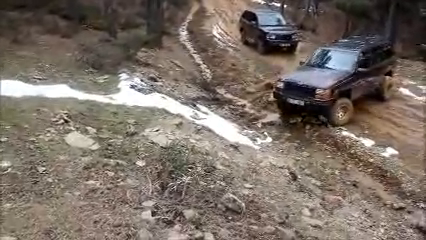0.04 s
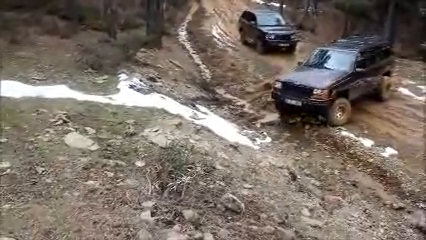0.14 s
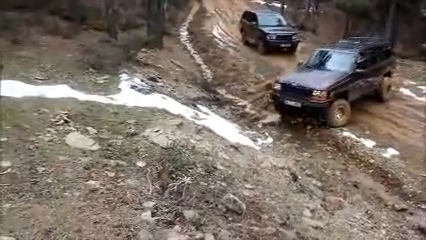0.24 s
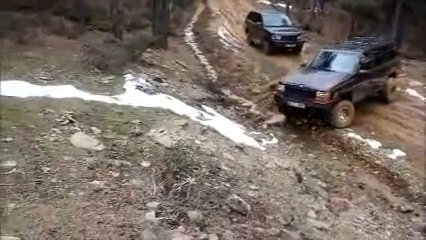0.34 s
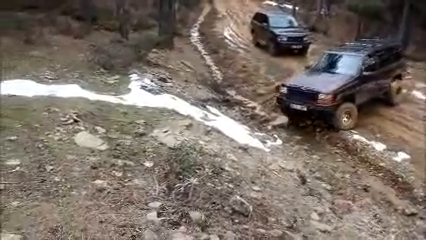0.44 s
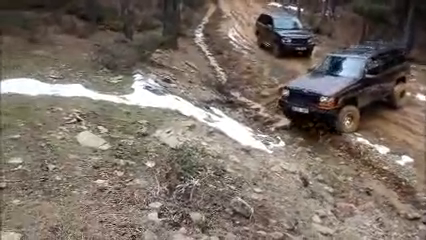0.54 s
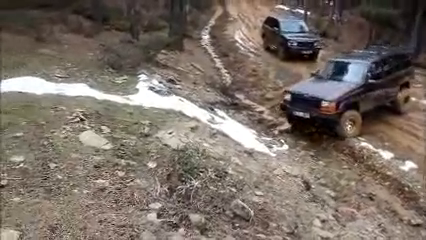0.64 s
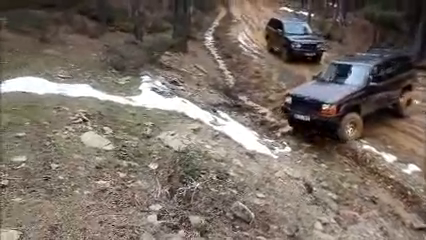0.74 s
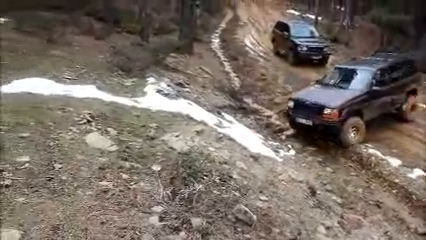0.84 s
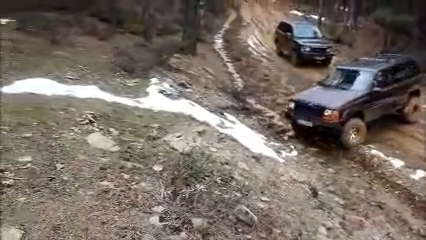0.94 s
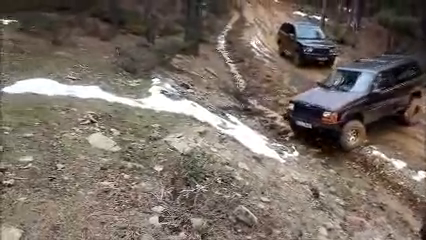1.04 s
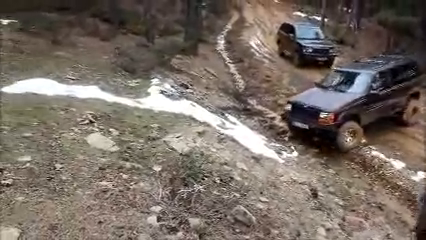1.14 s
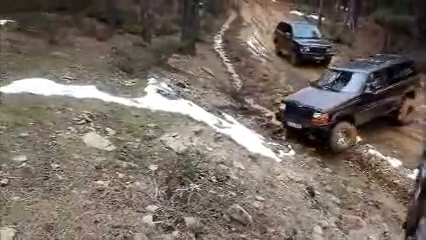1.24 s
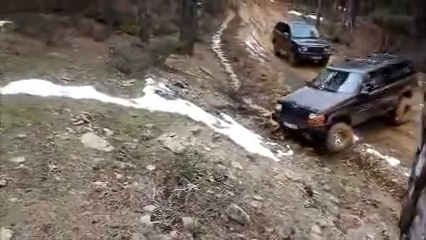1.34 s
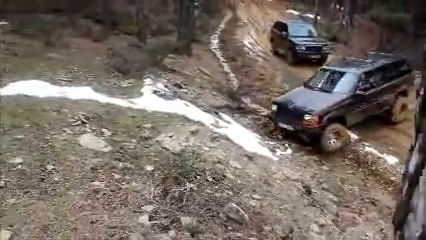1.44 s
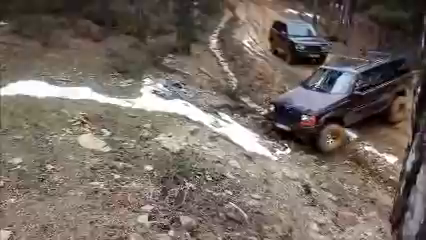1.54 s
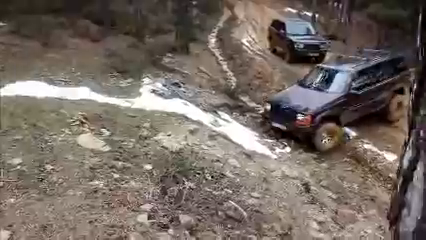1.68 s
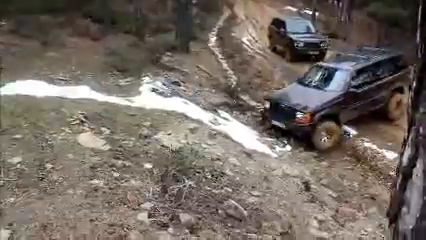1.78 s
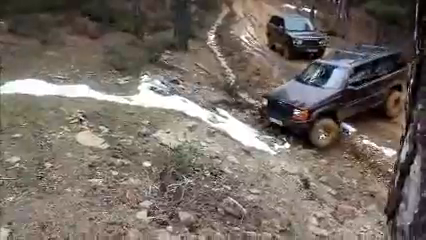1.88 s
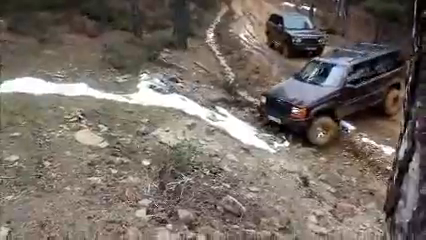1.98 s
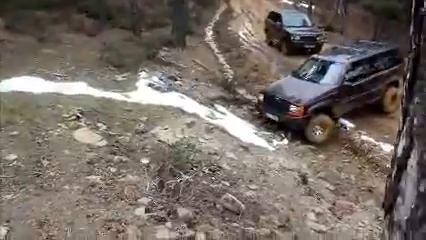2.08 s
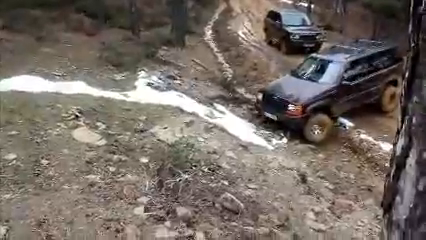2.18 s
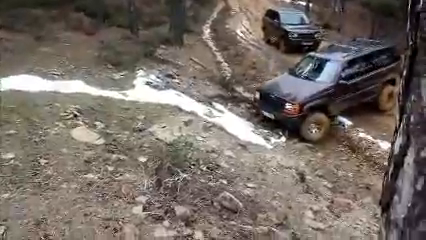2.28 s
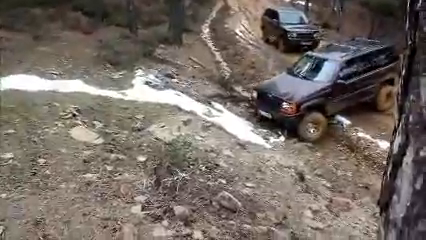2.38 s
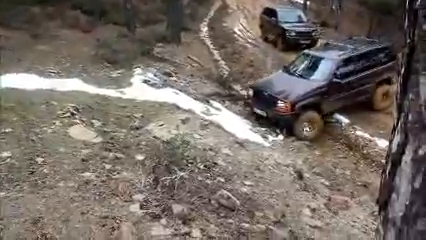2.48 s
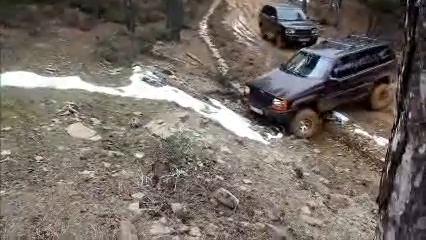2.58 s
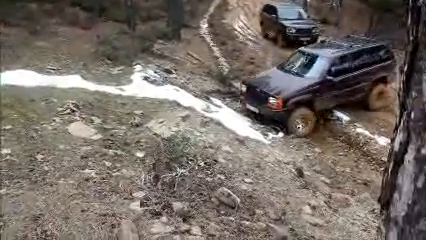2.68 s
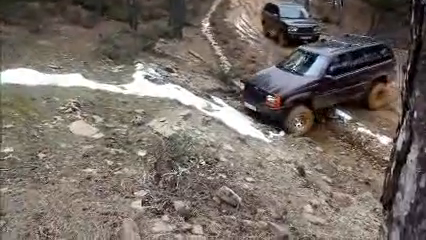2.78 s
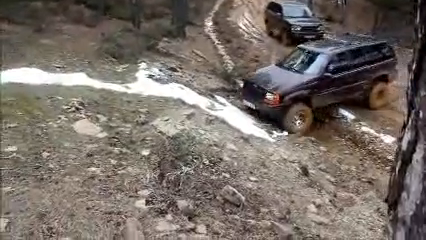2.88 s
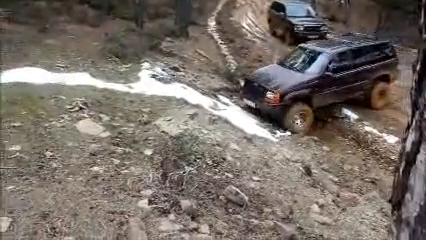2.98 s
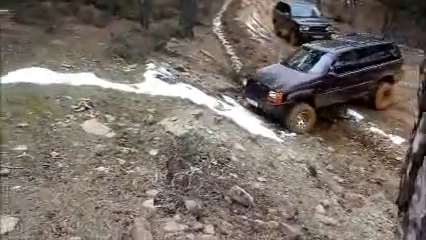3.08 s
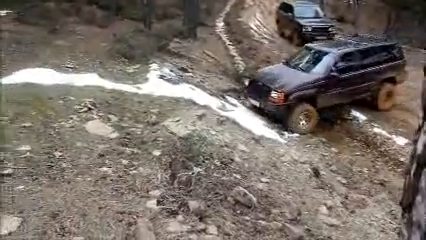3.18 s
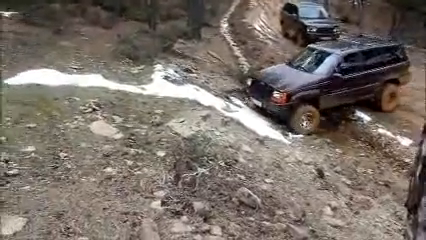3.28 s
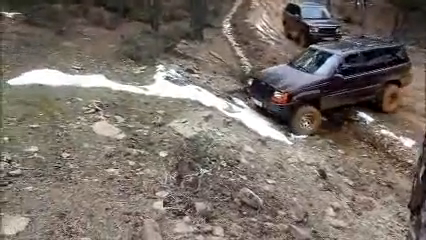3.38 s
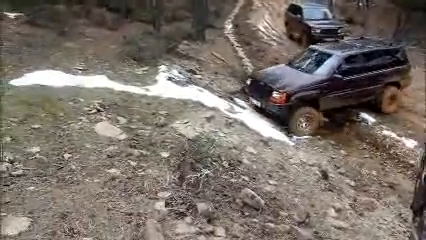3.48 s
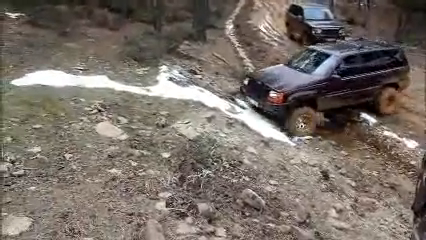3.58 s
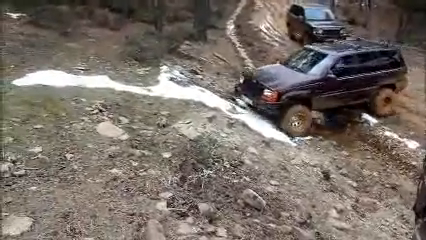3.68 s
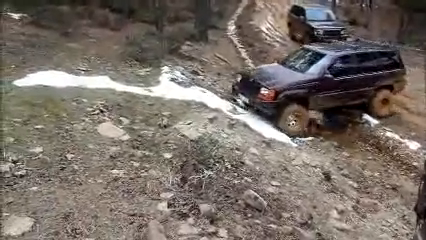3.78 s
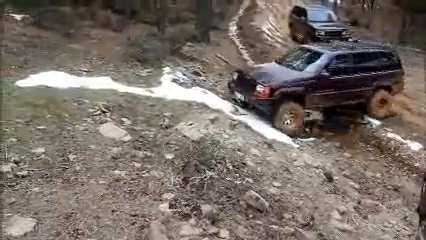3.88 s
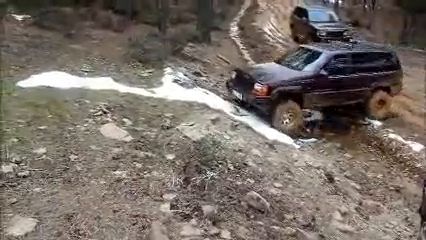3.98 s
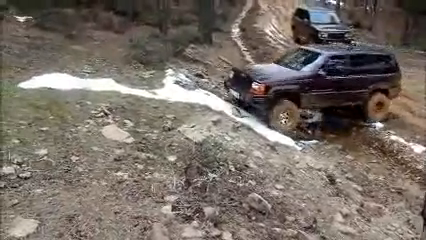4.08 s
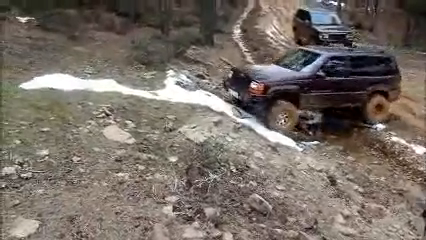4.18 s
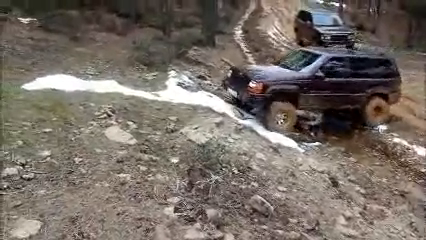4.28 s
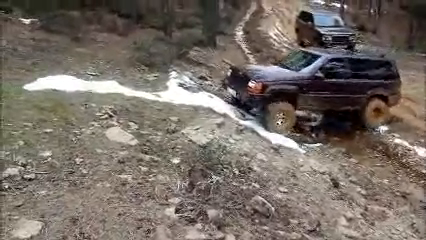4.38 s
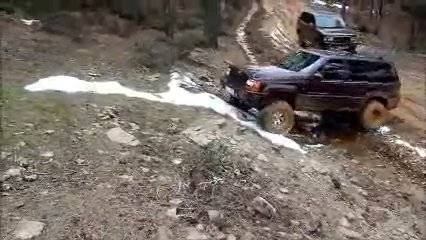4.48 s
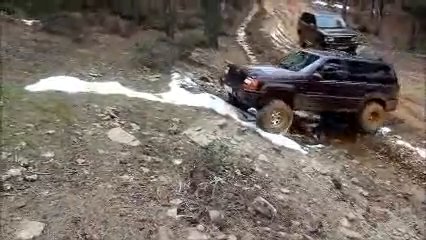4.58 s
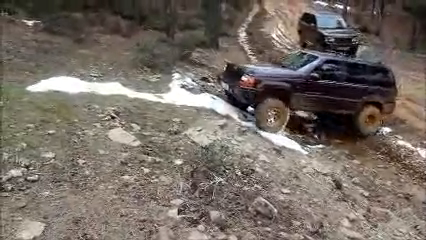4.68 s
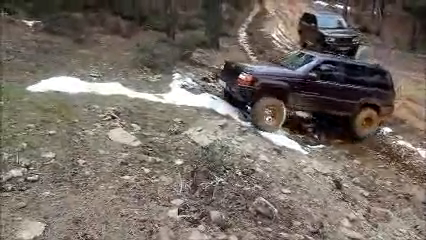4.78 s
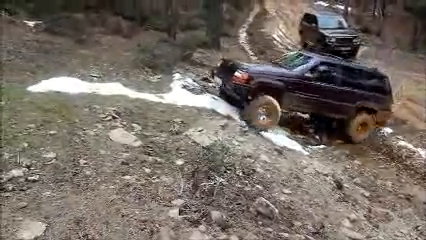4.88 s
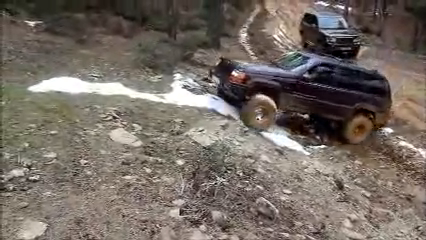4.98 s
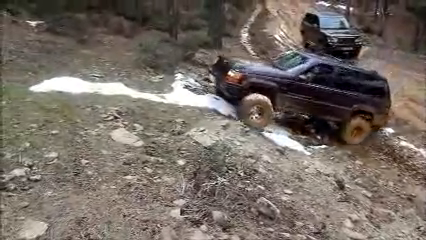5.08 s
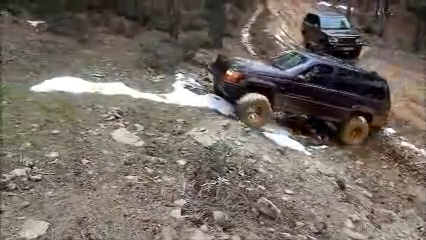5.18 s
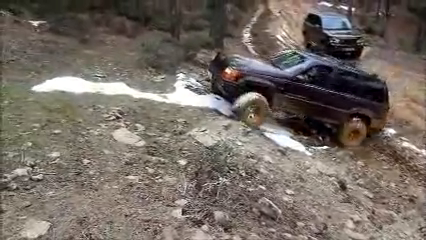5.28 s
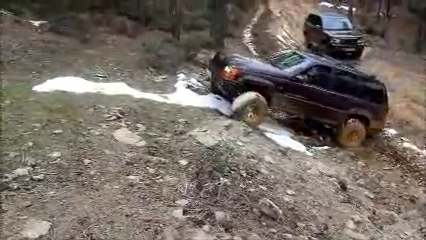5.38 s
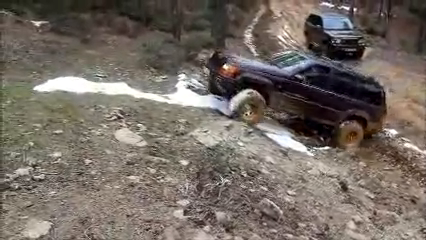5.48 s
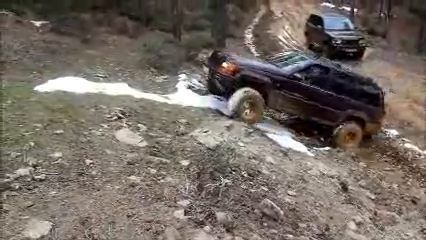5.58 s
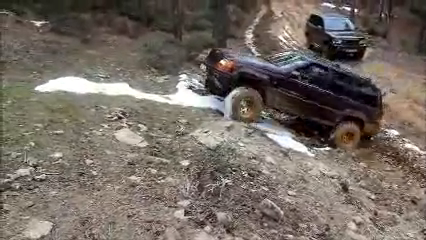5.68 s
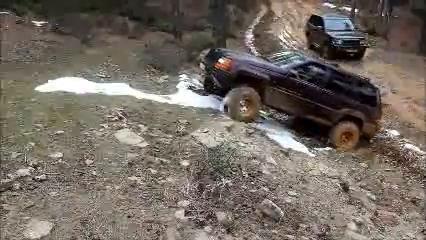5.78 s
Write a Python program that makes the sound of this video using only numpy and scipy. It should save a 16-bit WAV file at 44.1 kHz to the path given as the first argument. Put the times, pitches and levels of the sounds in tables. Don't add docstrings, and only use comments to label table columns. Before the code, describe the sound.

A petrol eight-cylinder off-roader idles with a low, uneven burble on a muddy forest slope, while a second vehicle's diesel knocks steadily and faintly, about twenty-three times a second. Small snaps lead to a loud, sharp cluster at 0.75 s, then sparse ticks. At about 2.3 s the engine blips, peaking near 2.7 s and falling by 3.1 s; a stronger, higher rev follows around 3.5 s amid dense twig snaps, gritty ticks and crunching stones. As revs fall at 3.7 s, a mid-pitched gear whine swells briefly and fades, with mud spray hissing near 4 s. From 4.2 s the engine pulls under load, growling louder. A broad, heavy wood crack and scrape hits at 4.9 s, with tyre grind peaking at 5 s. Revs dip slightly, then climb to the loudest growl at the end, about 5.8 s, with more scraping and mud. Mono, close and dry.

```python
import sys
import numpy as np
from scipy import signal
from scipy.io import wavfile
from scipy.ndimage import uniform_filter1d

SR = 44100
rng = np.random.default_rng(int(sys.argv[2]) if len(sys.argv) > 2 else 0)


def gain_from_db(level_db):
    decades = np.asarray(level_db, float) / 20
    return 10 ** decades


def log_audio(samples):
    frames = np.atleast_2d(samples).T
    limited = np.clip(frames, -1, 1)
    pcm = np.round(limited * 32767).astype(np.int16)
    wavfile.write(sys.argv[1], SR, pcm)


N = 257525

# (time [s], firing rate [1/s])
PEDAL = [(0.0, 52.3), (0.74, 45.3), (1.55, 50.5), (2.0, 44.6), (2.175, 44.8), (2.51, 83.8), (2.695, 91.1),
         (3.16, 49.0), (3.435, 107.2), (3.565, 116.9), (3.79, 90.9), (4.0, 57.3), (4.28, 71.6),
         (4.48, 78.8), (5.01, 88.5), (5.24, 79.8), (5.625, 102.7), (5.84, 101.4)]
# (time [s], exhaust level [dB], throttle [-1 shut to 1 open])
EFFORT = [(0.0, -33.5, -0.34), (0.83, -38, 0.98), (1.46, -34.5, 0.024), (2.18, -38.5, 0.68),
          (2.37, -24.5, 0.63), (2.6, -19, 0.014), (2.78, -21, -0.23), (3.15, -33.5, -0.3),
          (3.25, -23.5, 0.5), (3.4, -18.5, -0.017), (3.67, -19.5, 0.13), (3.98, -32, -0.71),
          (4.21, -24.5, -.25), (4.73, -17, 0.25), (4.92, -17.5, -.2), (5.01, -23, -0.79), (5.07, -18, 0.21),
          (5.84, -15, -0.059)]
# (puff strength [dB], lag in the manifold [ms])
CYLINDERS = [(-1.1, .3), (-2.8, -.6), (4.7, -.1), (-4.9, .9), (.7, -.5), (5.7, .1), (-4.6, -.1), (2.2, .1)]
# (multiple of the two-turn cycle [-], level at idle [dB], level under load [dB])
ORDERS = [(4, -8.8, -22), (5, -4.4, 12), (6, 7.6, -23), (7, 3, -3), (8, 25, 12.5), (9, 5.0, -7.5),
          (10, -14, 2), (11, 24, 7), (12, -12, -4), (13, 19, -1.5), (14, -39, -2.5), (15, -6, -13),
          (16, 7, 12.5), (17, -9, -7), (18, -3, -4), (19, 9.5, -1.5), (20, 3, -0.5), (21, 6.5, 2.5),
          (22, -5, 6.5), (23, -5, -1.5), (24, 6.5, 2), (25, 4, 10)]
# (frequency [Hz], level [dB])
PIPE = [(40, -58), (55, -24.5), (75, -18), (100, -10), (125, -2.7), (150, -2.8), (175, 2), (200, -4.5),
        (225, -2), (250, -7.5), (275, -8), (300, -23), (340, -22.5), (420, -26.5)]
# (frequency [Hz], density [dB per Hz])
RUMBLE = [(18, -39), (30, -36), (64, -16.5), (233, 4), (262, -7), (315, -28), (400, -1), (520, -49),
          (880, -120)]
# (frequency [Hz], density [dB per Hz])
RUSH = [(180, -31), (300, 15), (349, -16.5), (391, -4.5), (716, -2.5), (768, -7), (1250, -4.5),
        (2500, -17.5), (3250, -30), (5500, -120)]
# (time [s], level [dB])
SLIP = [(0, -42.5), (1.46, -42), (1.8, -44.5), (2.16, -45.5), (2.6, -39), (2.78, -38), (2.88, -40),
        (3.25, -41), (3.5, -33.5), (3.67, -38.5), (3.8, -41), (3.98, -41), (4.54, -43.5), (4.9, -38),
        (5.01, -29), (5.25, -39.5), (5.66, -34.5), (5.84, -34.5)]
# (frequency [Hz], density [dB per Hz])
GRIND = [(710, 6), (1200, -0.5), (1860, 3), (3560, -1), (4010, -10), (4340, -8), (8000, -19), (10400, -56),
         (17600, -120)]
# (frequency [Hz], density [dB per Hz])
SPRAY = [(2940, 2), (5000, 1), (9120, -4.5), (11800, -4), (14800, -6.5), (15600, -13)]
# (time [s], level [dB], fall time [s])
SPLASHES = [
    (2.78, -54, 0.16),
    (3.05, -50, .1),
    (3.37, -44, 0.28),
    (3.95, -43, 0.3),
    (4.35, -47.5, 0.17),
    (4.63, -48, 0.075),
    (4.9, -44.5, 0.087),
    (5.56, -46, 0.055),
    (5.74, -45, 0.48),
]
# (time [s], peak level [dB], centre frequency [Hz])
SNAPS = [(0.306, -19, 2340), (0.5257, -23, 2630), (0.7507, -6, 2930), (0.7634, -19, 2810),
         (0.7689, -10, 2230), (0.7774, -12.5, 3000), (0.7914, -19, 3390), (0.8024, -15.5, 3350),
         (1.0422, -24, 3810), (1.241, -19, 2200), (3.44, -13, 1500), (2.6694, -22, 2390),
         (2.6974, -16, 2470), (2.7352, -20, 2790), (3.0073, -18.5, 3570), (3.1018, -17.5, 2820),
         (3.1544, -21, 3700), (3.2114, -13, 2800), (3.2824, -14, 3200), (3.3276, -22, 3370),
         (3.3575, -13, 2470), (3.3742, -17, 3470), (3.4247, -17.5, 3350), (3.4838, -4.5, 1800),
         (3.5882, -15.5, 3280), (3.6217, -14, 3570), (3.7037, -16, 3390), (4.7694, -18, 2310),
         (5.1674, -29, 2290), (5.2175, -18, 2650)]
# (time [s], peak level [dB], centre frequency [Hz])
TICKS = [(0.7502, -37, 9850), (0.7682, -20, 10500), (1.2545, -34, 8790), (2.6349, -30, 8820),
         (2.6584, -29, 9090), (2.6978, -27, 11300), (2.7606, -28, 10900), (2.9097, -23.5, 11300),
         (3.031, -24, 8000), (3.0774, -37, 8040), (3.1133, -25, 8000), (3.246, -27, 8260),
         (3.3344, -20, 10900), (3.4237, -20.5, 8170), (3.5588, -26, 10900), (3.703, -36, 9710),
         (5.2126, -38, 8360)]
# (time [s], rms level
# [dB], low edge [Hz], high edge [Hz], t60 [s])
CRACKS = [(0.7422, -18.5, 900, 1430, 0.015), (1.535, -43, 2200, 6360, 0.14),
          (0.771, -46.5, 2000, 7850, 0.31), (2.666, -38.5, 3920, 6760, 0.16),
          (3.328, -28.5, 1700, 3800, 0.039), (3.364, -31, 2800, 4000, 0.085),
          (3.424, -33.5, 2960, 3900, 0.09), (3.54, -28, 1010, 2300, 0.034), (3.586, -29, 1710, 2140, 0.071),
          (4.899, -17.5, 920, 2480, 0.1), (4.903, -19.5, 2200, 5320, 0.095), (4.93, -21, 890, 1390, 0.11),
          (4.93, -31.5, 1500, 5070, 0.21), (4.991, -27, 990, 4400, 0.17), (5.545, -33, 1500, 4300, 0.16),
          (5.69, -28, 597, 2280, 0.19), (5.785, -28.5, 600, 2480, 0.34)]
# (frequency [Hz], level [dB], t60 [s])
DIESEL_BLOCK = [(595, -40, 0.1), (1018, -41.5, 0.12), (1162, -38.5, 0.04), (1304, -36.5, 0.1),
                (1890, -29, 0.0078), (2530, -52, 0.0082), (3700, -59, 0.01)]
DIESEL_KNOCKS = [-0.7, -1, -3.5, -2]


def rms_one(x):
    return x / np.sqrt(np.mean(x ** 2) + 1e-20)


def in_time(rows):
    s, *columns = np.transpose(rows)
    return [np.interp(np.arange(N) / SR, s, c) for c in columns]


def at_hz(points, hz):
    table_hz, level_db = np.transpose(points)
    return np.interp(np.log(hz), np.log(table_hz), level_db)


def drift(rate_hz):
    r = np.exp(-80 * np.pi * rate_hz / SR)
    slow = signal.lfilter([1], [1, -2 * r, r * r], rng.standard_normal(N // 40 + 2002))[2000:]
    return np.interp(np.arange(N) / 40, np.arange(len(slow)), rms_one(slow))


def ring(clicks, hz, t60):
    r = gain_from_db(-60 / (max(t60, .001) * SR))
    w = 2 * np.pi * hz / SR
    return signal.lfilter([0, np.sin(w)], [1, -2 * r * np.cos(w), r * r], clicks + 1e-18)


def cut(x, hz, kind, order):
    return signal.sosfilt(signal.butter(order, hz, kind, fs=SR, output="sos"), x)


def banded(source, spectrum, patchy_db):
    hz = np.transpose(spectrum)[0]
    edges = np.geomspace(hz[0], hz[-1], int(3 * np.log2(hz[-1] / hz[0])) + 1)
    out, together = 0, drift(22)
    for k, (low, high) in enumerate(zip(edges, edges[1:])):
        band_db = at_hz(spectrum, np.sqrt(low * high)) + patchy_db * (together + drift(20))
        out = out + gain_from_db(band_db) * cut(source[k % 2], [low, high], "band", order=2)
    return rms_one(out)


def grit(per_s, spread_db, share):
    sizes = gain_from_db(spread_db * np.minimum(rng.exponential(1, (2, N)), 4)) * rng.choice([-1, 1], (2, N))
    grains = sizes * (rng.random((2, N)) < per_s / SR)
    return rng.standard_normal((2, N)) + share * rms_one(grains)


def burst(s, rise, t60, size):
    t = np.arange(size) / SR
    shape = (1 - np.exp(-t / max(rise, 1e-4))) ** 2 * gain_from_db(-60 * t / max(t60, .002))
    return round(s * SR), shape / shape.max(), rng.standard_normal(size)


def revs():
    per_s, = in_time(PEDAL)
    size = round(.155 * SR)
    for _ in range(2):
        per_s = uniform_filter1d(per_s, size=size, mode="nearest")
    return per_s


def exhaust(per_s, level_db, throttle):
    burble_db = 9.5 * np.log2(per_s / 80) + .5 * throttle
    bass_db = 9 * throttle + .5 * np.log2(np.maximum(per_s / 80, 1))
    step = 10
    cycle_hz, level_db = per_s[::step] / 8, level_db[::step]
    burble_db, bass_db = burble_db[::step], bass_db[::step]
    cycles = np.cumsum(cycle_hz) * step / SR - .02
    load = np.clip((level_db + 32) / 6, 0, 1)
    puff_db, lag_ms = np.transpose(CYLINDERS)[:, :, None]
    slot = np.arange(8)[:, None] / 8
    # (idle dB, load dB), uneven or on the firing rate
    high = [(k, *((-2.5, 4.5) if k % 8 else (6.5, 9))) for k in range(26, 49)]
    lines, power = 0, 0
    for k, idle_db, load_db in [*ORDERS, *high]:
        k = round(k)
        hz = k * cycle_hz
        turns = k * slot + hz[::50] * lag_ms / 1000
        puffs = np.sum(gain_from_db(puff_db) * np.exp(-2j * np.pi * turns), axis=0)
        start = np.interp(np.arange(len(hz)) / 50, np.arange(len(puffs)), np.unwrap(np.angle(puffs)))
        silencer = 1 + 2 * np.pi * .007 * np.maximum(hz - 160, 0)
        order_db = idle_db + load * (load_db - idle_db) + burble_db * (k % 8 > 0)
        size = gain_from_db(at_hz(PIPE, hz) + order_db + bass_db * np.log2(16 / min(k, 24)))
        power = power + size ** 2 / 2
        wobble = drift(3.4)[::step]
        phase = 2 * np.pi * k * cycles + start - silencer + .15 * wobble[::-1]
        lines = lines + size * gain_from_db(1.2 * wobble) * np.cos(phase)
    pipe = signal.resample_poly(gain_from_db(level_db) * lines / np.sqrt(power), step, 1)[:N]
    beat = np.repeat(np.cos(16 * np.pi * cycles), step)[:N]
    return pipe, beat


def engine_rumble(exhaust_db):
    noise = rng.standard_normal((2, N))
    return gain_from_db(-43.5 + .7 * (exhaust_db + 34)) * banded(noise, RUMBLE, patchy_db=.5)


def air_rush(slip, effort, beat):
    level_db = -36.5 + .66 * slip + .096 * effort
    return gain_from_db(level_db + 1.2 * beat) * banded(grit(600, 3.5, share=.3), RUSH, patchy_db=.6)


def tyre_grind(grind_db):
    return gain_from_db(grind_db) * banded(grit(300, 3.2, share=.6), GRIND, patchy_db=1.6)


def crunch(grind_db):
    per_s = 40 * gain_from_db(2.6 * (grind_db + 42) + 6 * drift(15))
    sizes = gain_from_db(3.63 * np.minimum(rng.exponential(1, N), 4)) * rng.choice([-1, 1], N)
    grains = sizes * (rng.random(N) < per_s / SR)
    dealt = rng.integers(0, 12, N)
    out = np.zeros(N)
    for k, hz in enumerate(np.geomspace(900, 6000, 12)):
        out += ring(grains * (dealt == k), hz, 16 / hz) * 1500 / hz
    return gain_from_db(-40) * out


def mud_spray(slip, effort):
    t = np.arange(N) / SR
    power = gain_from_db(2 * (-54.5 + .42 * slip + .14 * effort))
    for s, db, fall in SPLASHES:
        away = np.where(t < s, (s - t) / .087, (t - s) / fall)
        power = power + gain_from_db(2 * db) * np.exp(-2 * away)
    return np.sqrt(power) * banded(grit(400, 4.5, share=.3), SPRAY, patchy_db=.5)


def snaps_and_ticks():
    out = np.zeros(N + 30000)
    for s, db, hz in SNAPS:
        i, shape, noise = burst(s, .0004, .016, size=2000)
        body = cut(noise * shape, [.55 * hz, 1.5 * hz], "band", order=2)
        out[i:i + 2000] += gain_from_db(db - 6.5) * body / np.abs(body).max()
    for s, db, hz in TICKS:
        i, shape, noise = burst(s, .0003, .012, size=1000)
        top = cut(noise * shape, [.7 * hz, min(1.4 * hz, 17000)], "band", order=2)
        out[i:i + 1000] += gain_from_db(db - 8) * top / np.abs(top).max()
    return out[:N]


def cracks():
    out = np.zeros(N + 30000)
    for s, db, low_hz, high_hz, t60 in CRACKS:
        i, shape, noise = burst(s, .041 * t60, t60, size=20000)
        splinters = (rng.random(20000) < .02) * noise[::-1]
        wood = cut(noise * (1 + 2.6 * splinters), [low_hz, high_hz], "band", order=4)
        out[i:i + 20000] += gain_from_db(db) * shape * rms_one(wood)
    return out[:N]


def drive_line_whine():
    peak_s, end_s, peak_db, hold_db = 3.744, 4.65, -31.5, -48
    t = np.arange(N) / SR - peak_s
    linger_db = hold_db - 100 * np.maximum(t + peak_s - end_s, 0)
    after_db = np.maximum(peak_db - 65 * t, linger_db)
    level_db = np.where(t < 0, peak_db + 20 * t / .05, after_db)
    return np.sqrt(2) * gain_from_db(level_db + 1.3 * drift(10)) * np.sin(2 * np.pi * 362 * t)


def diesel():
    count = np.arange(140)
    at = ((.012 + count / 23.4) * SR).astype(int)
    at = at[at < N]
    cylinder_db = np.array(DIESEL_KNOCKS)[count[:len(at)] % 4]
    out = np.zeros(N)
    for hz, db, t60 in DIESEL_BLOCK:
        knocks = np.zeros(N)
        knocks[at] = gain_from_db(db + cylinder_db + rng.normal(0, .38, len(at)))
        combustion = signal.lfilter([1], [1, -np.exp(-1 / (.009 * SR))], knocks)
        out += ring(.66 * knocks + combustion * rng.standard_normal(N) / 12, hz, t60)
    return out


def scene():
    per_s = revs()
    exhaust_db, throttle = in_time(EFFORT)
    grind_db, = in_time(SLIP)
    slip, effort = grind_db + 41, exhaust_db + 28
    pipe, beat = exhaust(per_s, exhaust_db, throttle)
    engine = pipe + engine_rumble(exhaust_db) + air_rush(slip, effort, beat)
    ground = tyre_grind(grind_db) + crunch(grind_db) + mud_spray(slip, effort)
    debris = snaps_and_ticks() + cracks()
    return (engine + ground + debris + drive_line_whine() + diesel())[None]


def top_cut(x):
    return signal.sosfilt(signal.butter(12, 15780, fs=SR, output="sos"), x)


def record(dry):
    own = gain_from_db(-60) * rms_one(cut(rng.standard_normal(N), 35, "low", order=2)) + 0.0013
    squashed = 0.91 * np.tanh(cut(dry, 33, "high", order=2) / 0.89)
    return top_cut(squashed + own)


dry = scene()
out = record(dry)
log_audio(out)
```